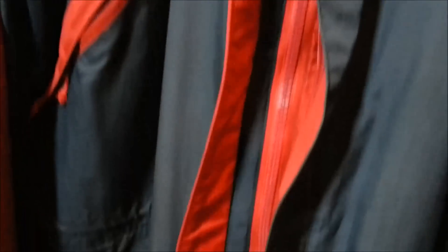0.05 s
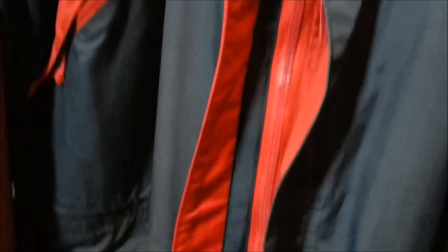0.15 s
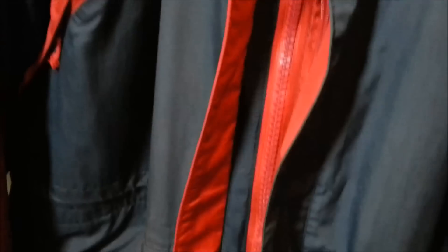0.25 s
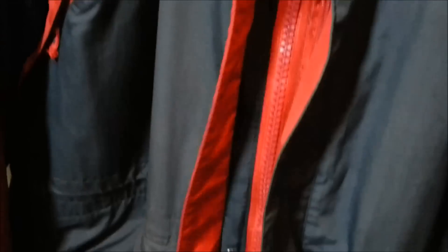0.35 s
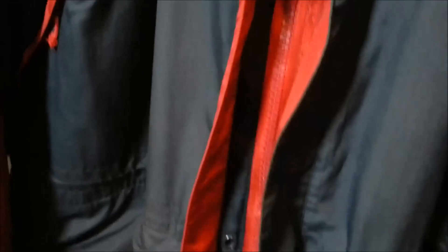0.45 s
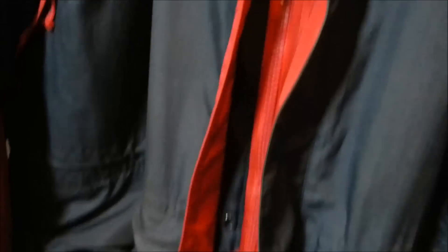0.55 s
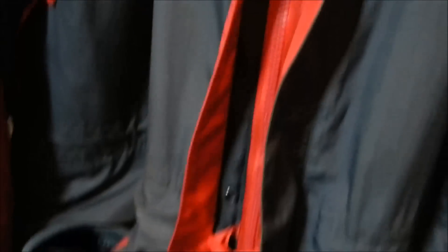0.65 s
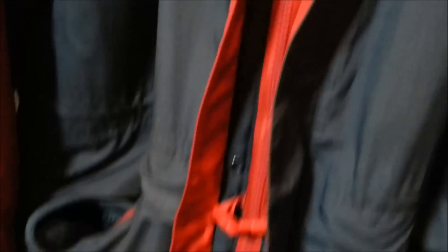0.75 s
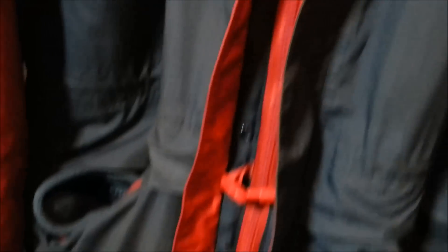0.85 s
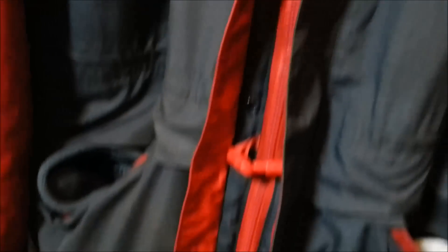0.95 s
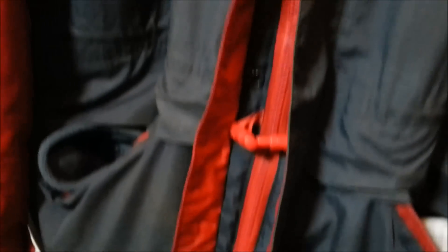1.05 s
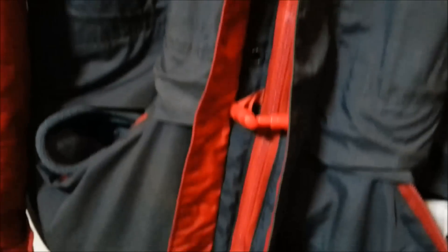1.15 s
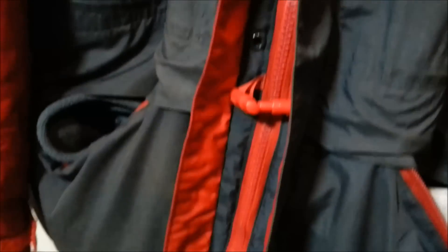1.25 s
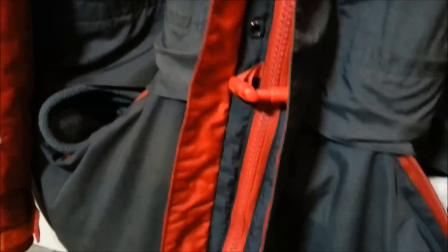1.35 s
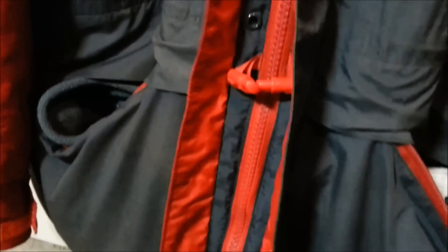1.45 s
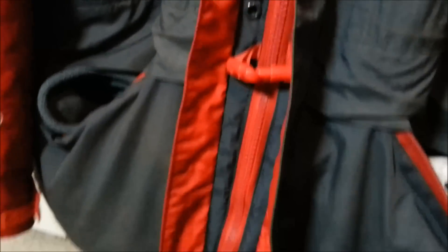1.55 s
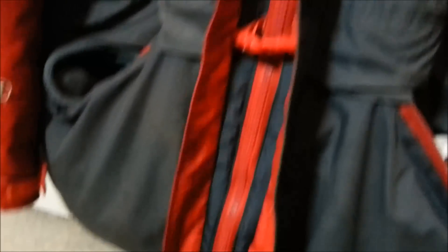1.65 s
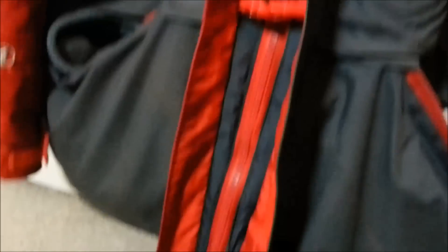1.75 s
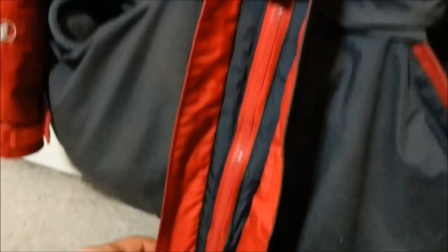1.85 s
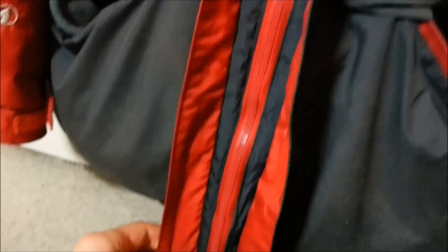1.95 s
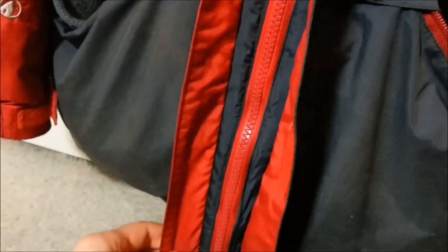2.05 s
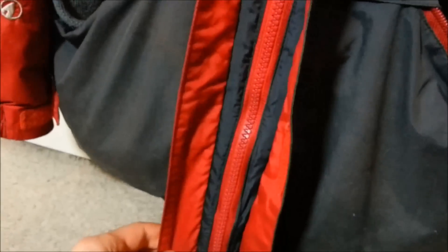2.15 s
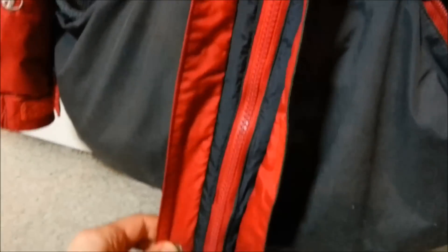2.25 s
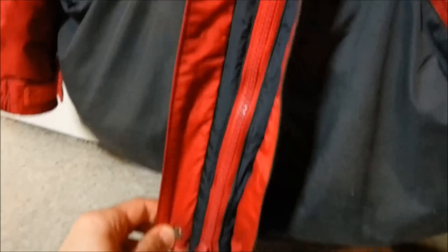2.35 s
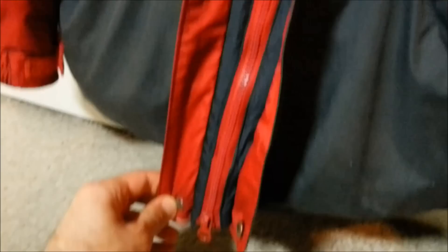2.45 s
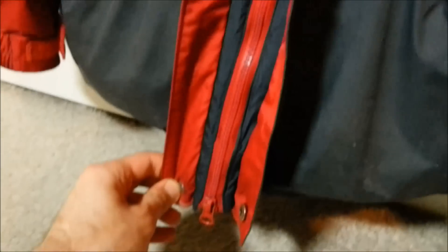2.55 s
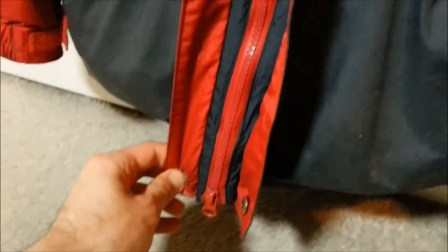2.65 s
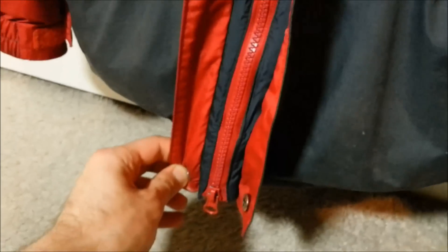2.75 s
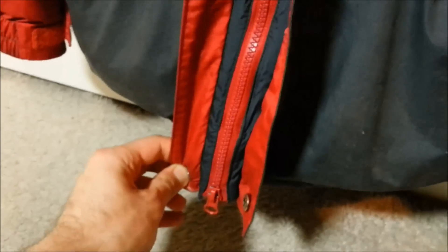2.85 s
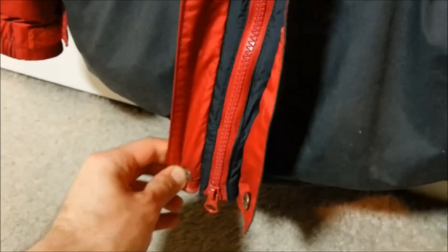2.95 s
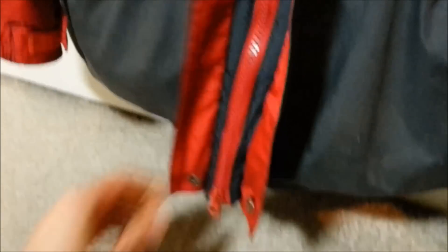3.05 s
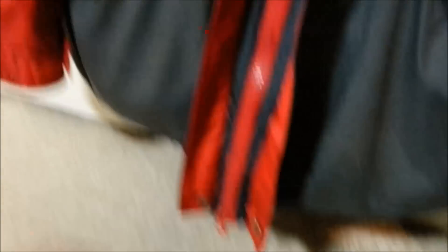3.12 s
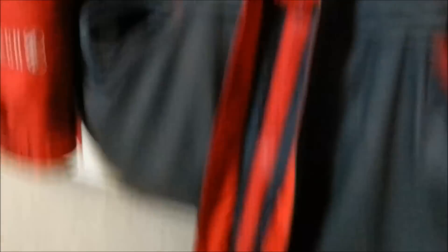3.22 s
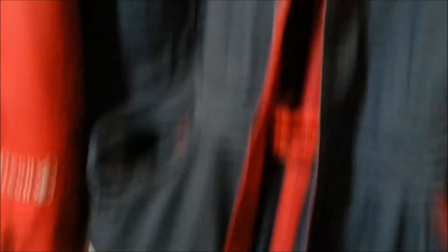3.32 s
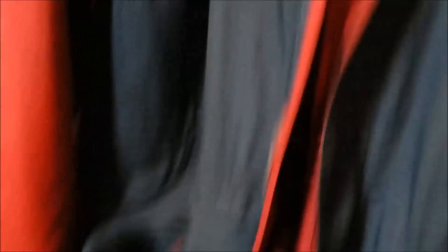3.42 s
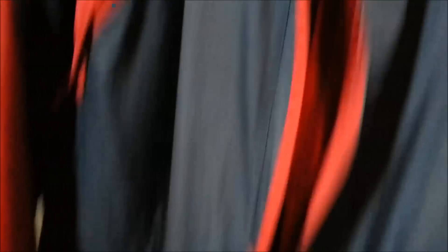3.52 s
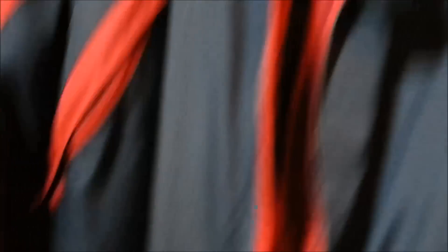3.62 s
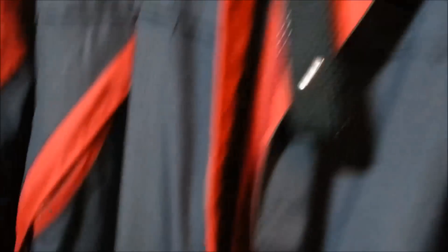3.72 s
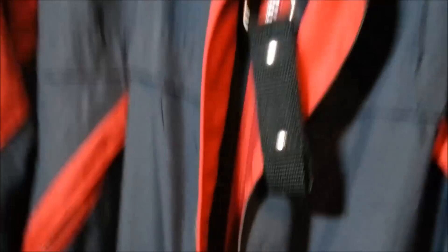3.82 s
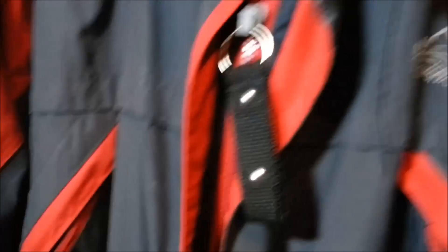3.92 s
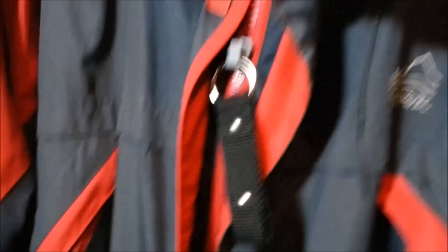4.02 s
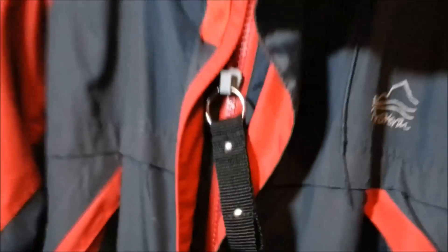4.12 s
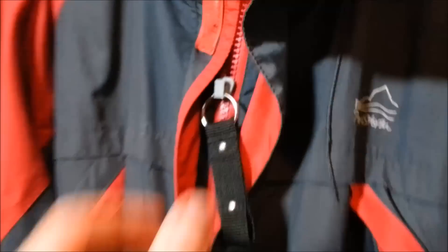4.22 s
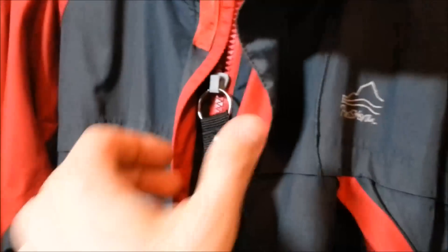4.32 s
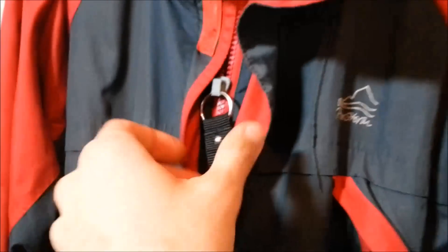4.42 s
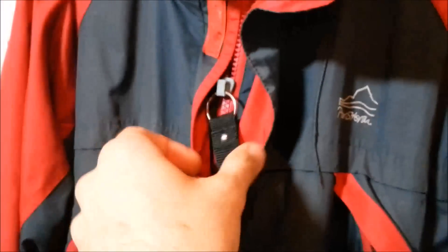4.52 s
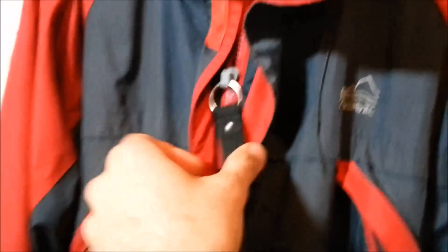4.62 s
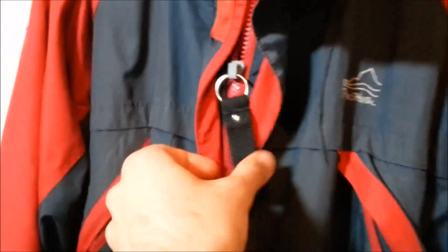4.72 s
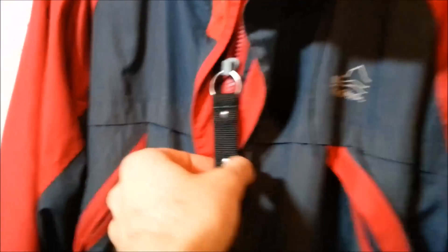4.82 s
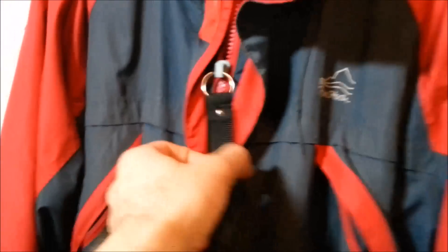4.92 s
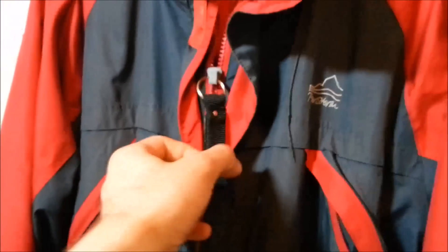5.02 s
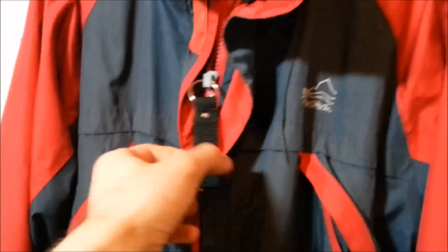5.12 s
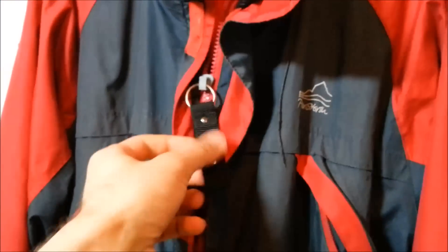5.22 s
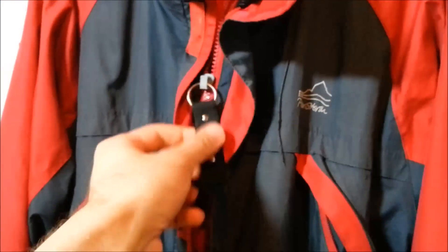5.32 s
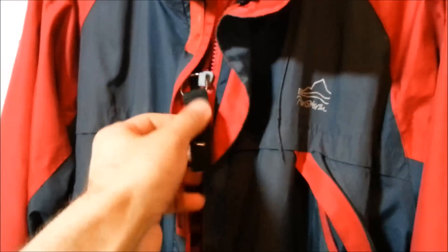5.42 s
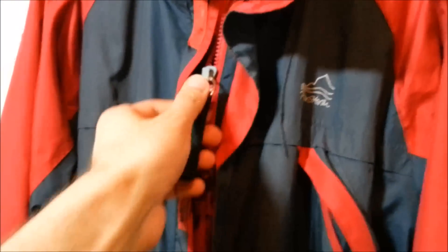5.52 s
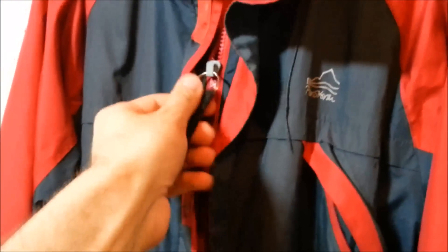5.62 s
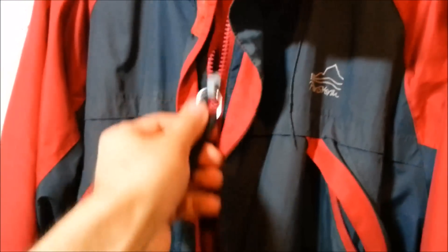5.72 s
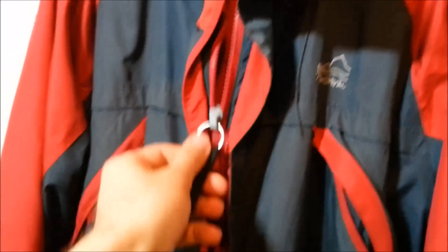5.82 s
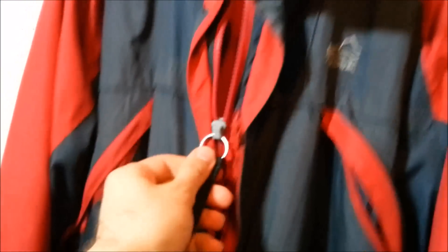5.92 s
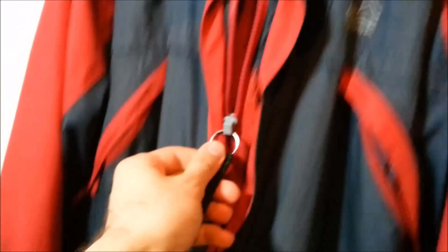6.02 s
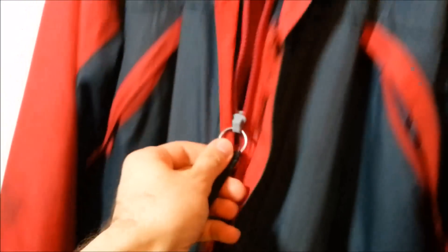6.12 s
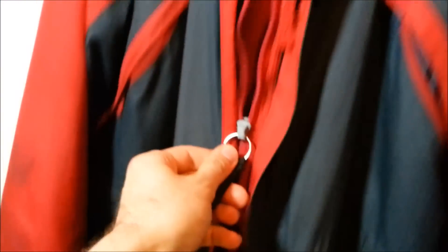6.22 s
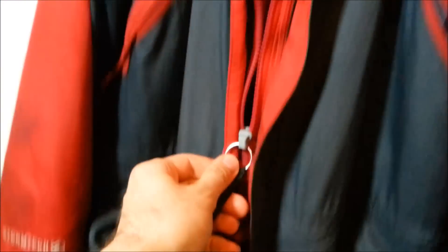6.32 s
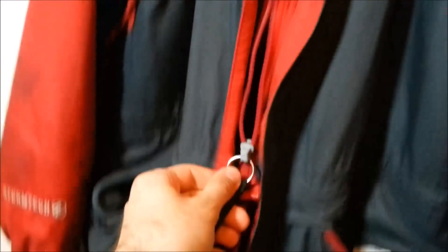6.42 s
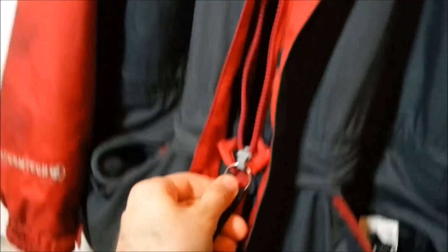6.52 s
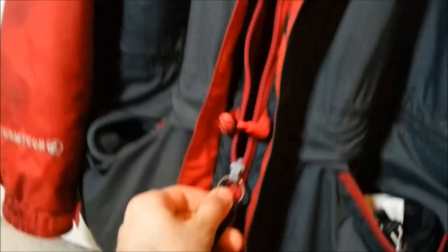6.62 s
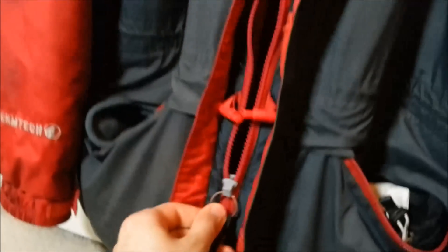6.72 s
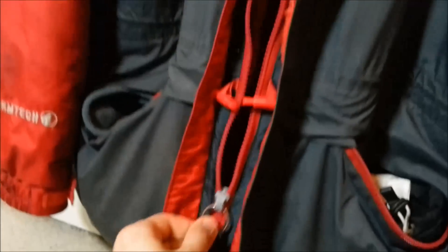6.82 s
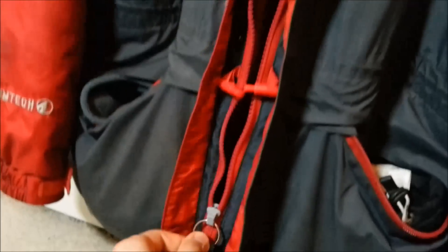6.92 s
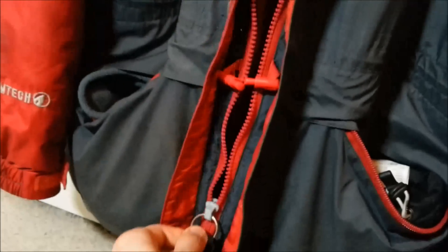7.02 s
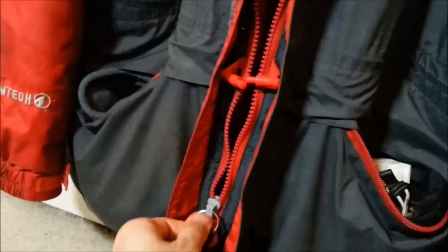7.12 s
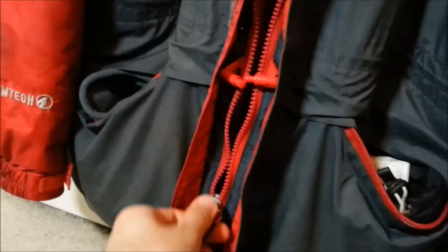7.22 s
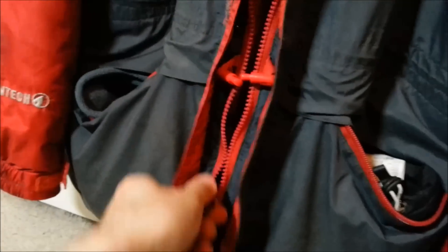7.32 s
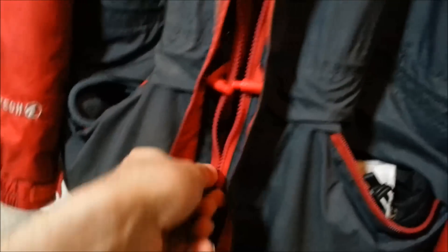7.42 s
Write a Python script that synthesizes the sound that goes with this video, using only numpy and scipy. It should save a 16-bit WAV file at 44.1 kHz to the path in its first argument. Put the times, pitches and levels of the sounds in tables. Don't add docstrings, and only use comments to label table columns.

```python
import sys
import numpy as np
from scipy import signal
from scipy.fft import rfft, irfft, next_fast_len
from scipy.io import wavfile
from scipy.ndimage import uniform_filter1d

SR = 44100
rng = np.random.default_rng(int(sys.argv[2]) if len(sys.argv) > 2 else 0)


def linear_from_db(decibels):
    return 10 ** (np.asarray(decibels, float) / 20)


def dump_mix(stems):
    frames = np.atleast_2d(stems).T
    limited = np.clip(frames, -1, 1)
    pcm = np.round(limited * 32767).astype(np.int16)
    wavfile.write(sys.argv[1], SR, pcm)


N = 328986
T = np.arange(N) / SR
SIZE = next_fast_len(N + 4096)
HZ = np.maximum(np.arange(SIZE // 2 + 1) * SR / SIZE, 1)

# [peak t/s, rise to -20
# dB/s, fall to -20 dB/s, swish level/dB, crumple re swish/dB]
NYLON_STROKES = [(0.0, .1, 0.81, -46, -14), (0.308, 0.22, 0.97, -59, -9), (0.63, 0.36, 0.91, -54.5, -14.5),
                 (0.772, 0.19, 0.037, -53, -9), (0.87, 0.043, 0.06, -69, 3.5),
                 (1.01, 0.014, 0.056, -54, -5.5), (1.084, 0.11, 0.075, -53.5, -15),
                 (1.282, 0.39, 0.033, -60, -11), (1.338, 0.025, 0.04, -65.5, 3.5),
                 (1.46, 0.043, 0.066, -52.5, -4.5), (1.512, 0.083, 0.31, -46.5, -13),
                 (1.67, 0.047, 0.24, -44, -19.5), (1.852, 0.56, 0.045, -46.5, -12),
                 (1.95, 0.044, 0.036, -54.5, -14), (2.054, 0.046, 0.095, -64, -0.5),
                 (2.122, 0.021, 0.11, -57, -3.5), (2.374, 0.05, 0.054, -53.5, -5.5),
                 (2.48, 0.092, 0.23, -60.5, -4), (2.612, 0.57, 0.042, -65.5, -12),
                 (2.772, 0.073, 0.084, -71.5, 2),
                 (3.129, 0.045, 0.06, -44, -13), (3.19, 0.14, 0.053, -64, 10),
                 (3.29, 0.23, 0.31, -53, -0.5), (3.444, 0.2, 0.11, -48.5, -20),
                 (3.524, 0.29, 0.067, -63, 14.5), (3.6, 0.076, 0.27, -50, -7),
                 (3.74, 0.43, 0.077, -52, 1.5), (3.85, .06, 0.22, -60, 9), (3.992, .3, 0.31, -60.5, 5),
                 (4.171, .4, 0.04, -62, 0), (4.26, 0.29, 0.13, -62.5, -25), (4.44, 0.37, 0.33, -63.5, -2),
                 (4.586, 0.063, 0.024, -63, -24),
                 (4.632, .03, 0.054, -56, -11), (4.7, 0.054, 0.33, -65.5, -1.5),
                  (4.832, 0.021, 0.12, -51.5, -5.5), (5.056, 0.16, 0.046, -52, -5.5),
                  (5.154, 0.086, 0.061, -46.5, -14.5), (5.278, 0.098, 0.12, -56.5, -8),
                  (5.438, 0.06, 0.048, -49.5, -3), (5.578, 0.12, 0.059, -54, -4.5),
                  (5.74, 0.53, 0.05, -59.5, -5.5), (7.03, 0.033, 0.14, -74.5, 0),
                  (7.15, 0.035, 0.23, -75.5, -1), (7.22, .01, 0.15, -60.5, -3), (7.3, 0.024, 0.058, -58, 3),
                  (7.364, 0.04, 0.022, -57, -2.5), (7.4, .05, .15, -74.5, -2), (7.46, 0.023, .1, -57, -9)]
# [t/s, level/dB]
ARM_MOTION = [(0.0, -3), (0.6, -19), (0.98, 0), (1.68, -12), (2.1, 3.5), (2.49, -4), (2.64, -3),
              (2.95, -13), (3.26, 6), (3.7, 6), (4.0, 26.5), (4.3, -5), (4.88, 1.5), (5.6, -12), (6.2, 9),
              (6.86, 10), (7.1, -11), (7.46, 2.5)]
# [f/Hz, density/dB]
CLOTH_SPECTRUM = [(35, -20), (60, -12.5), (140, 2), (185, -9), (243, -0.5), (335, -4.5), (473, -1.5),
                  (560, -7.5), (680, -10.5), (984, -13.5), (1420, -12.5), (1790, -9.5), (4170, -12),
                  (5890, -13.5), (6700, -9), (7400, -8), (8300, -8.5), (14400, -20)]
# [t/s, f/Hz, level/dB]
FOLD_POCKET = [
    (3.2, 1575, -47),
    (3.394, 1547, -66),
    (3.52, 1520, -42.5),
    (3.636, 1609, -52.5),
    (3.718, 1567, -46),
    (3.808, 1486, -77),
    (3.826, 1435, -50),
    (3.988, 1465, -45),
    (4.15, 1410, -66),
]
# [t/s, pull level/dB, lean on slider body/dB, whine level/dB]
SLIDER_RUN = [
    (5.72, -63, -10, -62),
    (5.798, -46.5, 0.5, -68),
    (5.87, -49.5, 6.5, -52),
    (6.02, -48, -3.5, -54.5),
    (6.26, -39, -3.5, -56),
    (6.45, -42.5, 3, -55.5),
    (6.72, -47.5, 0.5, -79),
    (6.99, -46, -4.5, -59),
    (7.045, -71.5, 8, -66),
]
# [t/s, tooth rate f/Hz, hum level/dB, fade to -20 dB either side/s]
TAPE_TENSION = [(5.81, 280, -47, .09), (5.91, 310, -49, .07), (5.975, 255, -50, .07), (6.04, 290, -58, .05),
                (6.095, 412, -43, .08), (6.155, 470, -48, .05), (6.19, 345, -52, .06),
                (6.26, 430, -55, .06), (6.33, 300, -51, .08), (6.394, 295.2, -44, 0.07),
                (6.44, 309.8, -50, .04), (6.53, 295, -53, .1), (6.637, 305, -42, .06),
                (6.675, 312, -46, .06), (6.715, 320, -46, .08), (6.78, 265, -42, .09),
                (6.86, 290, -44, .08), (6.915, 265, -45, .08), (6.97, 255, -44, .08)]
# [f/Hz, density/dB]
SLIDER_SPECTRUM = [(35, -49), (60, -23), (134, -10), (202, -23), (306, -8), (359, -10), (555, -12.5),
                   (637, -13), (800, -14), (1020, -17), (1130, -9.5), (1250, -8), (1430, -4), (1700, -5.5),
                   (2020, -2), (2400, -0.5), (2900, -6), (3300, -3), (3720, -8.5), (4950, -10), (5900, -11),
                   (7070, -10), (14400, -25)]
# [f/Hz, level/dB, t60/s]
SHELL_MODES = [(1400, -4, 0.0099), (1980, 1, .008), (2530, -3.5, .008), (3300, 0.5, 0.019),
               (4950, -3, 0.0091), (7300, -3.5, .008)]
# [t/s, half width/s, level/dB]
SLIDER_STALL = (6.82, .013, -7)
# [t/s, peak level/dB, ring f/Hz, dull part re peak/dB]
SNAP_TICKS = [(1.0071, -35.5, 4960, -16), (2.117, -29, 7300, -18.5), (2.369, -36.5, 6400, -26),
              (2.766, -44, 2180, -18), (2.036, -57, 2000, -12), (5.408, -46, 4000, 3),
              (5.4195, -31, 5600, -18), (5.4252, -35.5, 5000, -7), (5.4403, -30, 4300, -13),
              (5.443, -42, 4570, -14), (5.4891, -47, 7500, -25), (5.5299, -38, 4940, -14),
              (5.5689, -31.5, 5100, -11), (5.571, -34, 6040, -8), (6.021, -30.5, 7200, -20),
              (6.5646, -34, 7200, -18), (6.8306, -35, 4100, -20), (6.8942, -43, 7200, -20),
              (7.2549, -39, 3300, -10), (7.2907, -34, 4800, -9), (7.299, -37, 3600, -14),
              (7.3087, -34, 4220, -20), (7.358, -50, 3200, -20), (5.7522, -41, 4200, 6),
              (6.5603, -28.5, 7200, -6.5), (6.5832, -20.5, 7600, -23), (6.5908, -19, 7750, -28),
              (6.6065, -20, 6100, -32), (6.622, -22, 7500, -28), (6.625, -27, 7540, -29),
              (6.6338, -21, 5800, -30), (7.357, -36.5, 3300, -28)]
RING_TICKS = [(3.351, -36.5, 6940, -13), (4.805, -46.5, 7100, -29), (4.9550, -45.5, 7450, -8.5),
              (5.0455, -29.5, 6650, -14), (5.0513, -36.5, 7100, -16), (5.1177, -46, 6580, -15),
              (5.2572, -44.5, 3940, -6), (6.796, -35, 7030, -24), (6.845, -34, 6400, -8),
              (6.9127, -34, 5440, -23), (7.215, -39, 5500, -12), (7.258, -42, 2180, -18),
              (7.314, -42, 2600, -14)]
# [t/s, peak level/dB, f/Hz, t60/s]
SPLIT_RING = (7.2165, -52, 7677, .12)
# [t/s, peak level/dB, f/Hz, t60/s]
SOFT_BUMPS = [(0.129, -59, 398, 0.078), (0.306, -55, 407, 0.077), (1.337, -55, 377, 0.15),
              (1.757, -49, 323, 0.12), (2.035, -45, 333, 0.044), (2.123, -50, 299, 0.075),
              (2.718, -52, 405, 0.053), (2.756, -53, 424, 0.04), (2.765, -42, 300, 0.04),
              (2.78, -53.5, 83.5, 0.1), (5.038, -57, 144, 0.13), (7.276, -50, 300, 0.044),
              (7.285, -47, 322, 0.04), (7.313, -50, 330, 0.046), (2.65, -59, 350, .08),
              (2.37, -53.5, 298, 0.066)]
# [t/s, peak level/dB, f/Hz, t60/s]
CASE_KNOCK = (3.969, -38, 100, .065)
# [f/Hz, density/dB]
AIR_SPECTRUM = [(35, -44), (60, -37), (134, 0), (176, -9), (285, -17), (376, 2.5), (421, -6), (731, -24),
                (984, -26), (1800, -25), (2200, -19), (2600, -28.5), (7070, -26), (14400, -34)]
# [t/s, level/dB]
PHONE_PAN = [
    (0.0, 1),
    (1.2, 3),
    (2.74, 4.5),
    (3.5, 3.5),
    (4.24, 4),
    (5.6, 3.5),
    (6.5, 3),
    (7.46, 4),
]
# [f/Hz, level/dB]
PORT_COLOUR = [(60, -3), (125, 5), (300, 5), (700, 4), (1300, 7), (2400, 11.5), (4400, 5.5), (5800, -1),
               (6600, -13), (7300, -11), (7900, -3.5), (8600, -2.5), (11000, 1), (15000, 2.5)]
# [f/Hz, share/0-1]
PORT_SHARE = [(30, 0.31), (100, 0.66), (300, 0.86), (600, 0.78), (1200, 0.62), (2400, 0.7), (6000, 0.38),
              (15000, 0.28)]
# [f/Hz, level/dB]
CASE_COLOUR = [(600, -2), (750, 1.5), (1000, 0), (1150, 3), (1300, 1.5), (1450, 0.5), (1750, -2.5),
               (2200, 1), (2600, -1.5), (8500, -1), (10000, -4.5), (12000, -5.5), (14300, -9.5)]


def cloth():
    flap_db, flap_share = -3, 0.85
    sway_db, sway_share = -68, 0.67
    strokes = NYLON_STROKES
    (motion_db,), _ = curves(ARM_MOTION)
    swishes = swell([row[:-1] for row in strokes])
    folds = swell([(s, rise, fall, db + over) for s, rise, fall, db, over in strokes])
    shoves = swell([(s, rise, fall, db + flap_db + flap_share * over) for s, rise, fall, db, over in strokes])
    fibres = grains(spread_db=2.5, patch_db=1.5, patch_rate=30)
    weave_db = 1.02 * walk(7)
    coarse = colour(fibres, CLOTH_SPECTRUM, 3090, 6620) * linear_from_db(weave_db - 3.5)
    fine = colour(fibres, CLOTH_SPECTRUM, lo_hz=6100) * linear_from_db(-weave_db)
    swish = 0.63 * (coarse + fine)
    crumple = colour(grains(spread_db=5.5, patch_db=1.0, patch_rate=18), CLOTH_SPECTRUM, 766, 3520)
    flap = colour(grains(spread_db=4.5, patch_db=2.0, patch_rate=14), CLOTH_SPECTRUM, hi_hz=866)
    sway = np.hypot(shoves, linear_from_db(sway_db + sway_share * motion_db))
    return swish * linear_from_db(1.0) * swishes + crumple * folds * linear_from_db(-1.46) + flap * sway


def fold():
    taut_s = 3.84
    (hz, db), on = curves(FOLD_POCKET)
    pocket = whine(hz, width_hz=490)
    overtone = 0.44 * whine(1.95 * hz, width_hz=810)
    drum = 0.62 * (T > taut_s) * whine(0.18 * hz, width_hz=70)
    return on * linear_from_db(db - 9.0) * (pocket + overtone + drum)


def zip_run():
    pull_ref_db = -46.5
    body_ref_db, body_share = -45.5, 0.44
    shake_ref_db, shake_share = -41, 0.026
    rattle_db, rattle_spread_db = -8, 3.5
    (pull_db, lean_db, whine_db), on = curves(SLIDER_RUN)
    pull_over_db = pull_db - pull_ref_db
    moving_db = np.minimum(pull_over_db + 5.5, 0)
    body_db = body_ref_db + lean_db + body_share * pull_over_db + moving_db - pull_db
    shake_db = shake_ref_db + shake_share * pull_over_db + moving_db - pull_db
    whine_db = whine_db + moving_db - pull_db
    whine_hz = 2320 + 35 * pull_over_db - 150 * (T - SLIDER_RUN[1][0])
    judder = np.where(T < 6.62, 0.12, 0.34)

    midway_s = np.convolve([row[0] for row in TAPE_TENSION], [.5, .5], "valid")
    tooth_hz = np.array(TAPE_TENSION)[np.searchsorted(midway_s, T), 1]
    tooth_hz = uniform_filter1d(tooth_hz, size=600)
    taut = swell([(s, fade, fade, db) for s, _, db, fade in TAPE_TENSION])
    teeth = np.cumsum(tooth_hz * (1 + .022 * walk(45) + .07 * walk(400))) / SR
    count = np.floor(teeth).astype(int)
    odd = count % 2
    size = linear_from_db(rng.standard_normal(N)[count] - odd)

    knocks = unit(np.diff(count, prepend=0) * size * (1 - 2 * odd))
    passing = 2.0 + np.exp(-(teeth % 1) / 1.3)
    scrape = unit(grains(spread_db=1.0, patch_db=-0.2, patch_rate=40) * size * passing)
    hits = knocks * linear_from_db(rattle_spread_db * rng.standard_normal(N))
    rattle = unit(sum(linear_from_db(db + 3.8 * walk(25)) * ring(hits, f, t60) for f, db, t60 in SHELL_MODES))
    rasp = colour(scrape, SLIDER_SPECTRUM, lo_hz=3080)
    body = colour(scrape - 0.08 * hits, SLIDER_SPECTRUM, 470, 6200)
    shake = colour(scrape - 0.26 * np.abs(knocks), SLIDER_SPECTRUM, hi_hz=880)

    hum = np.sqrt(2) * np.sin(2 * np.pi * teeth) * linear_from_db(1.2 * walk(70))
    hum = hum + 2.0 * judder * np.sin(2 * np.pi * 1.28 * teeth) * linear_from_db(3.5 * walk(50))
    jerk = judder * np.sin(2 * np.pi * np.cumsum(66 * (1 + 0.1193 * walk(19))) / SR)

    scraped = rattle * linear_from_db(rattle_db + .5 * body_db)
    scraped = scraped + rasp * linear_from_db(1.8 * walk(60))
    scraped = scraped + body * linear_from_db(body_db - 8.5 + 1.6 * walk(50))
    scraped = scraped + shake * linear_from_db(shake_db - 10.0)
    scraped = scraped + size * whine(whine_hz, width_hz=700) * linear_from_db(whine_db)
    stall_s, half_s, stall_db = SLIDER_STALL
    caught = linear_from_db(stall_db * np.exp(-((T - stall_s) / half_s) ** 2))
    scraped = caught * linear_from_db(pull_db) * scraped * (1 + 0.23 * jerk)
    hum = np.sqrt(caught) * hum * taut * linear_from_db(moving_db - 5.0) * (1 + 1.4 * jerk)
    return on * (scraped + hum)


def ticks():
    snap_t60_s, ring_t60_s, room_t60_s = 0.011, 0.031, 0.076
    out, t = np.zeros((3, N + 6000)), np.arange(6000) / SR
    click = 1. * (t == 0)
    events = [(*row, snap_t60_s) for row in SNAP_TICKS] + [(*row, ring_t60_s) for row in RING_TICKS]
    for s, db, hz, dull_db, t60 in events:
        noise = rng.standard_normal((6, len(t)))
        bright = unit(bandpass(noise[:3], 3, hz / 1.65, hz * 1.53))
        dull = unit(bandpass(noise[3:], 2, 350, 2600))
        snap = bandpass(click, 3, hz / 1.65, hz * 1.53)
        edge = 0.85 * np.diff(click, prepend=0) * min(hz / 7000, 1) ** 3
        tone = 0.091 * np.sin(2 * np.pi * hz * t) * decay(t, 0.8 * t60)
        crack = -0.45 * snap / np.abs(snap).max() + edge + tone
        scatter = bright * (0.12 * decay(t, 0.0034) + 0.36 * decay(t, t60) + 0.065 * decay(t, room_t60_s))
        knock = 0.44 * linear_from_db(dull_db) * dull * decay(t, 2.2 * t60)
        out[:, int((s + .0008) * SR):][:, :len(t)] += linear_from_db(db) * (crack + scatter + knock)
    return out[:, :N]


def chime():
    s, db, hz, t60 = SPLIT_RING
    t = np.maximum(T - s, 0)
    return linear_from_db(db) * np.sin(2 * np.pi * hz * t) * decay(t, t60)


def bumps():
    pat_db, pat_hz = -8, 770
    out, t = np.zeros(N + 8000), np.arange(8000) / SR
    for s, db, hz, t60 in SOFT_BUMPS:
        swing = np.sin(2 * np.pi * hz * t)
        swing = swing + .5 * np.sin(2 * np.pi * 1.47 * hz * t + 6 * rng.random())
        pat = unit(bandpass(rng.standard_normal(len(t)), 1, pat_hz / 4.8, pat_hz * 0.53))
        push = (swing + linear_from_db(pat_db) * pat) * (1 - np.exp(-t / 0.00056)) * decay(t, t60)
        out[int(s * SR):][:len(t)] += linear_from_db(db - 1.5) * push
    return out[:N]


def thump():
    s, db, hz, t60 = CASE_KNOCK
    t = np.maximum(T - s, 0)
    turn = 2 * np.pi * hz * (.6 * t + .4 * .02 * (1 - np.exp(-t / .02)))
    return -linear_from_db(db) * 2 * np.sin(turn) * (1 - np.exp(-t / .006)) * decay(t, t60)


def grip():
    (motion_db,), _ = curves(ARM_MOTION)
    spectrum = [(10, -3), (30, -1), (60, 0), (200, 6), (400, -9)]  # f/Hz, density/dB
    rumble = colour(rng.standard_normal((2, N)), spectrum, hi_hz=75)
    rumble = linear_from_db(-86.5 + motion_db + np.array([[-1.1], [4.1]])) * rumble
    return rumble + linear_from_db(np.array([[-2.5], [2.5]])) * thump()


def air():
    return linear_from_db(-69) * colour(rng.standard_normal((3, N)) * linear_from_db(.7 * walk(6)), AIR_SPECTRUM)


def near_echo():
    echo_db, echo_t60_s = -13, .025
    t = np.arange(4000) / SR
    tails = rng.standard_normal((2, len(t))) * decay(t, echo_t60_s) * (t > .0005)
    return 1 + linear_from_db(echo_db) * rfft(tails / np.sqrt(np.sum(tails[0] ** 2)), SIZE)


def ports(x, echo, edge_db):
    lag_s, edge_hz = 8 / SR, 14650
    common, left, right = rfft(x, SIZE)
    alike = on_hz(PORT_SHARE)
    lag = np.exp(-2j * np.pi * HZ * lag_s * np.array([[1], [0]]))
    heard = np.sqrt(alike) * common * lag + np.sqrt(1 - alike) * np.array([left, right])
    top_db = edge_db * np.clip((HZ - edge_hz) / 200, 0, 1)
    heard = heard * echo * linear_from_db(on_hz(CASE_COLOUR) + top_db)
    return irfft(heard * linear_from_db(np.array([[.5], [-.5]]) * on_hz(PORT_COLOUR)), SIZE)[:, :N]


def grains(spread_db, patch_db, patch_rate):
    size_db = spread_db * np.minimum(rng.exponential(size=N), 4)
    slips = rng.standard_normal((3, N))
    patches_db = patch_db * walk(patch_rate) + 0.52 * patch_db * walk(8 * patch_rate)
    return slips * linear_from_db(size_db + patches_db)


def whine(hz, width_hz):
    turn = 2 * np.pi * np.cumsum(hz) / SR
    return np.array([walk(width_hz) * np.sin(turn) + walk(width_hz) * np.cos(turn) for _ in range(3)])


def ring(x, hz, t60):
    r = decay(1 / SR, t60)
    return unit(signal.lfilter([1, 0, -1], [1, -2 * r * np.cos(2 * np.pi * hz / SR), r * r], x))


def swell(rows):
    flank_bend = 1.415
    t = T[::32]
    power = 0
    for s, rise, fall, db in rows:
        away = np.maximum((s - t) / rise, (t - s) / fall)
        power = power + linear_from_db(2 * db - 40 * away ** flank_bend)
    return np.interp(T, t, np.sqrt(power))


def walk(rate):
    k = int(SR / rate)
    held = rng.standard_normal(N // 32 + 1)[np.arange(N) // k]
    return 1.3 * uniform_filter1d(uniform_filter1d(held, k), k)


def curves(table):
    rows = np.array(table)
    inside = (T >= rows[0, 0]) & (T < rows[-1, 0] + .001)
    return [np.interp(T, rows[:, 0], c) for c in rows.T[1:]], uniform_filter1d(1. * inside, size=300)


def colour(x, points, lo_hz=1, hi_hz=1e6):
    edges = 1 / np.sqrt((1 + (lo_hz / HZ) ** 8) * (1 + (HZ / hi_hz) ** 8))
    return unit(irfft(rfft(x, SIZE) * linear_from_db(on_hz(points[:-1])) * edges, SIZE)[..., :N])


def on_hz(points):
    hz, value = np.transpose(points)
    return np.interp(np.log(HZ), np.log(hz), value)


def bandpass(x, order, lo_hz, hi_hz):
    return signal.sosfilt(signal.butter(order, [lo_hz, hi_hz], "band", fs=SR, output="sos"), x)


def decay(t, t60_s):
    return np.exp(-np.log(1000) * t / t60_s)


def unit(x):
    return x / np.sqrt(np.mean(x ** 2))


def scene():
    (pan_db,), _ = curves(PHONE_PAN)
    pan_db = pan_db - 3.5
    soft = cloth() + fold() + zip_run() + bumps() + air()
    hard = ticks() + chime()
    echo = near_echo()
    near = ports(soft, echo, edge_db=-42) + ports(hard, echo, edge_db=-14)
    return near * linear_from_db(np.array([pan_db, -pan_db]) / 2 + 1.5) + grip()


def low_pass(x):
    return signal.sosfilt(signal.butter(12, 15680, fs=SR, output="sos"), x)


def record(dry):
    return low_pass(dry)


dry = scene()
out = record(dry)
dump_mix(out)
```